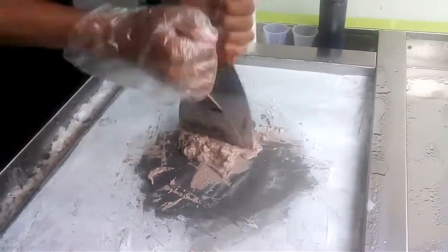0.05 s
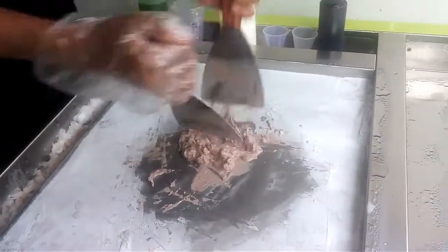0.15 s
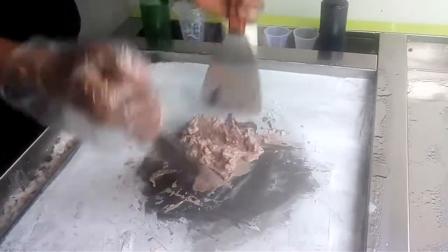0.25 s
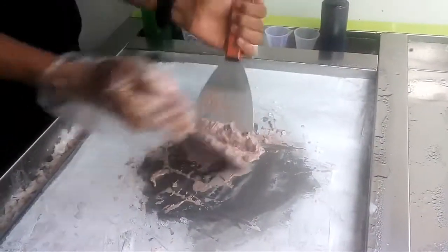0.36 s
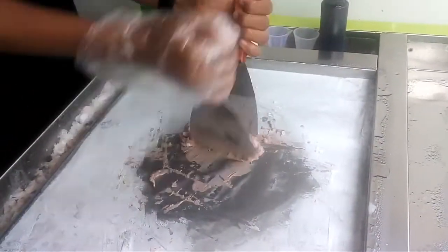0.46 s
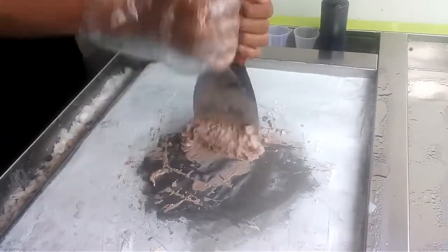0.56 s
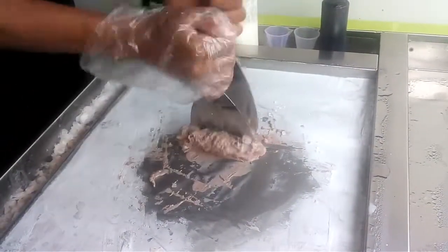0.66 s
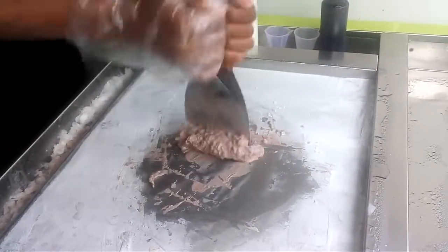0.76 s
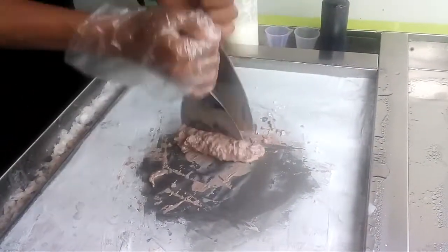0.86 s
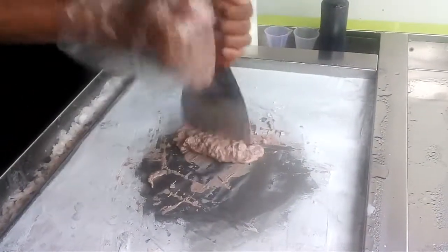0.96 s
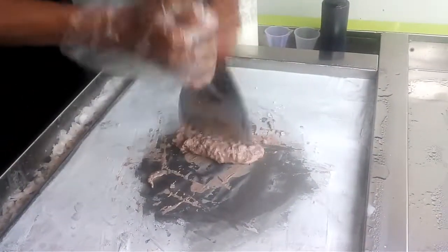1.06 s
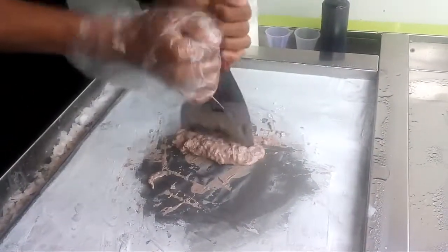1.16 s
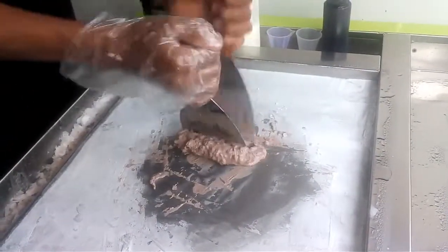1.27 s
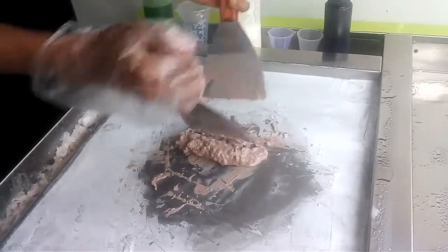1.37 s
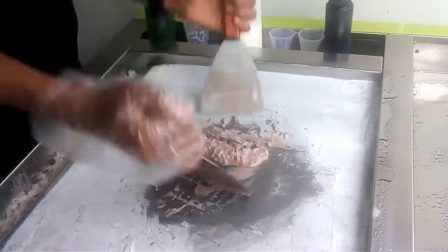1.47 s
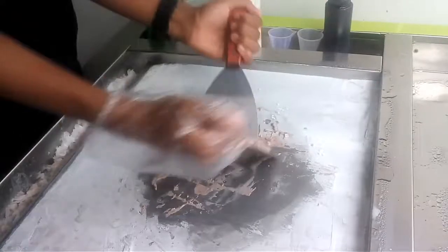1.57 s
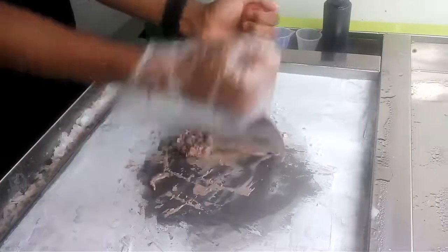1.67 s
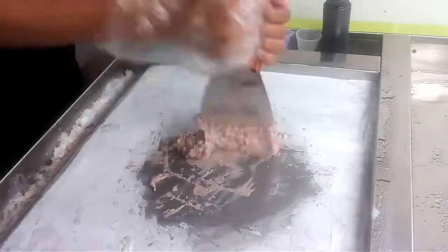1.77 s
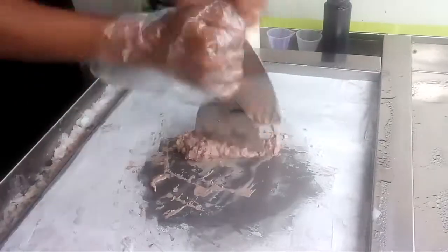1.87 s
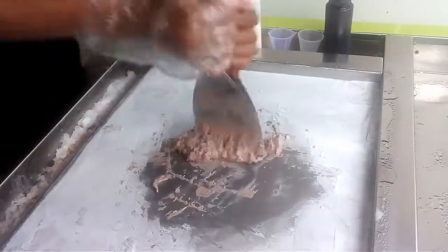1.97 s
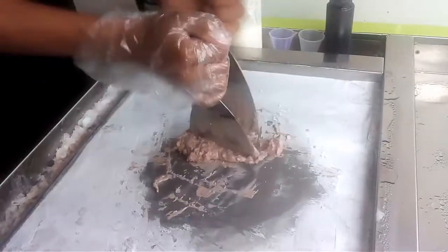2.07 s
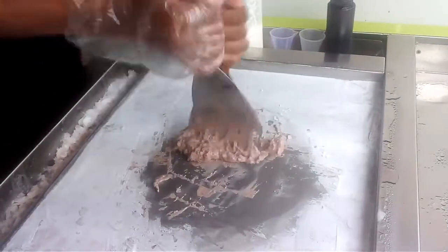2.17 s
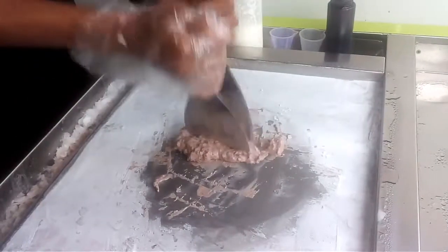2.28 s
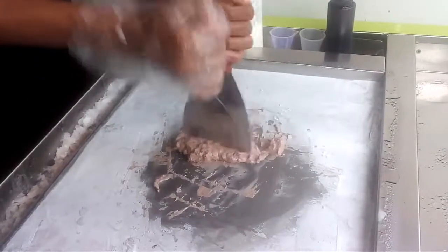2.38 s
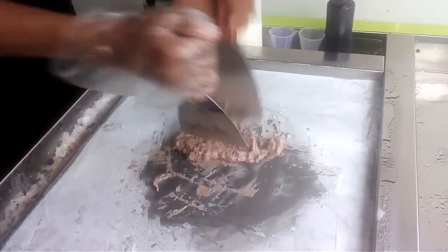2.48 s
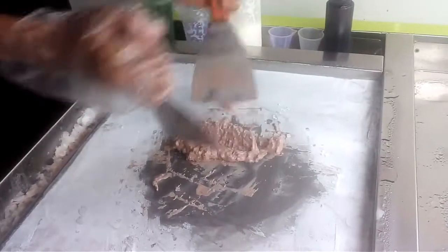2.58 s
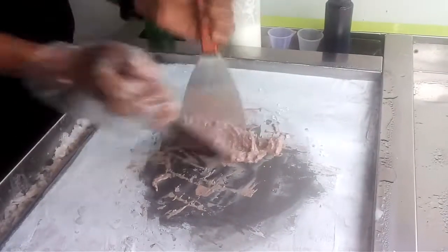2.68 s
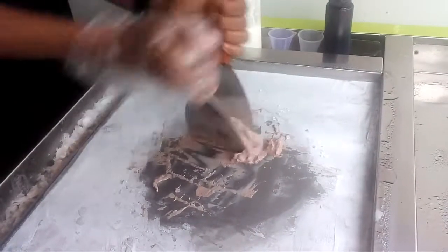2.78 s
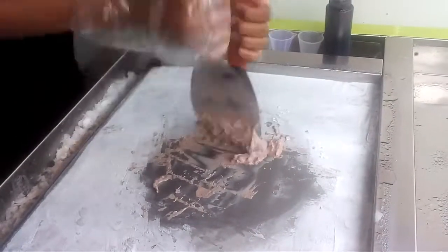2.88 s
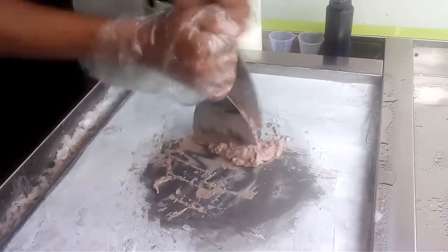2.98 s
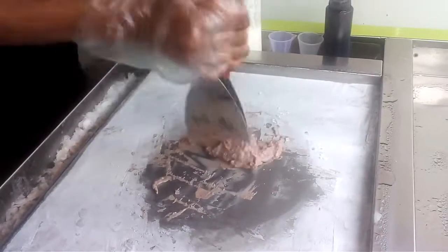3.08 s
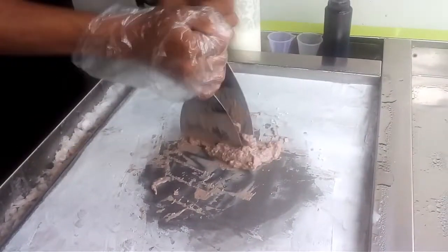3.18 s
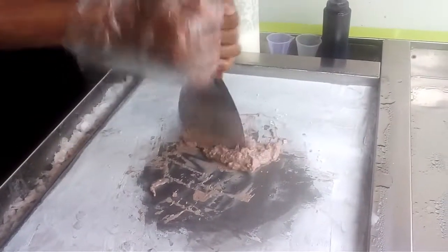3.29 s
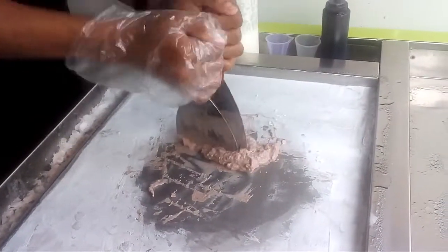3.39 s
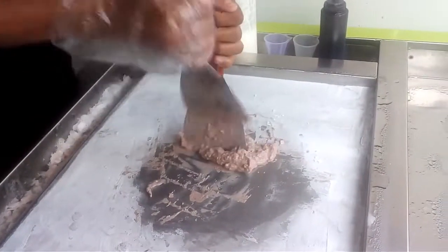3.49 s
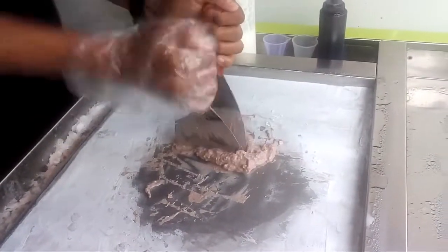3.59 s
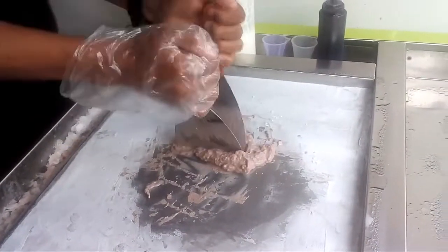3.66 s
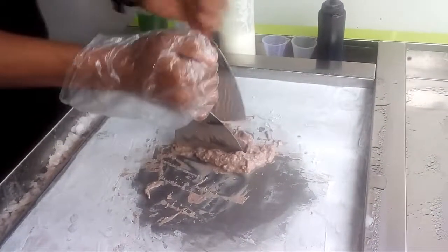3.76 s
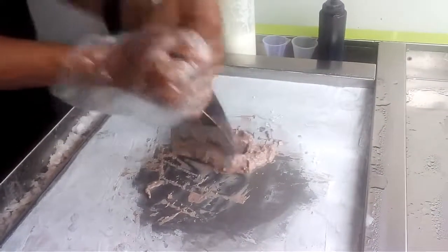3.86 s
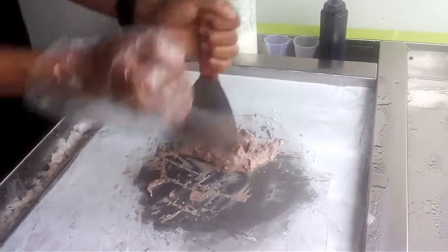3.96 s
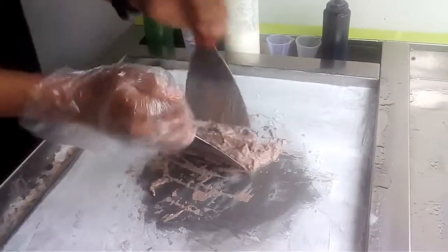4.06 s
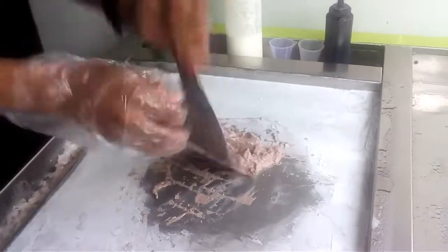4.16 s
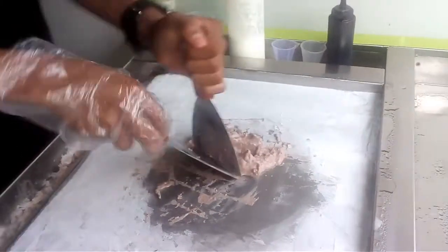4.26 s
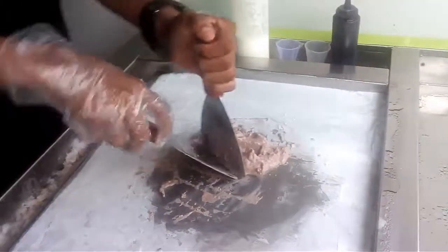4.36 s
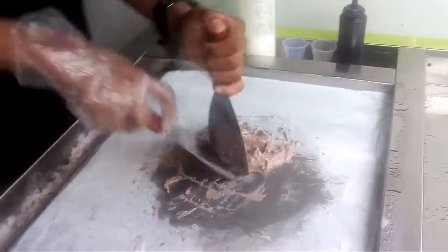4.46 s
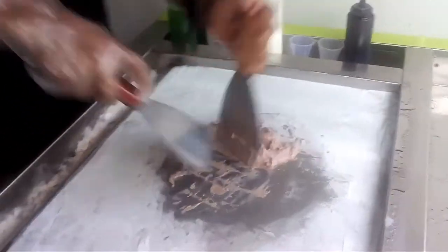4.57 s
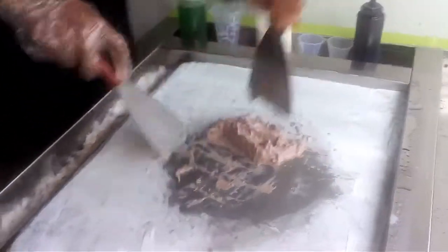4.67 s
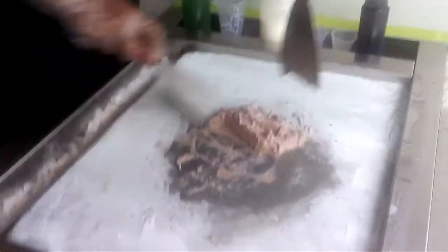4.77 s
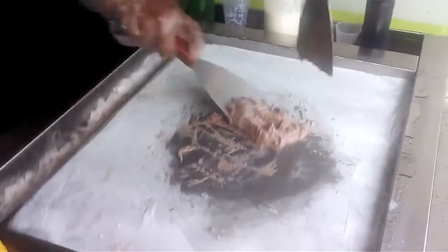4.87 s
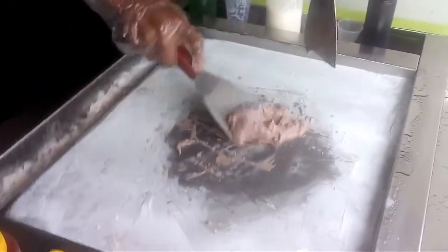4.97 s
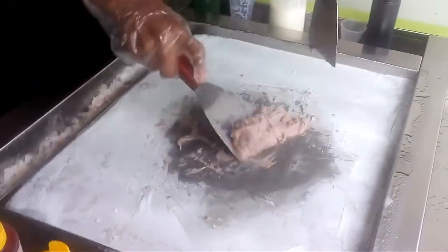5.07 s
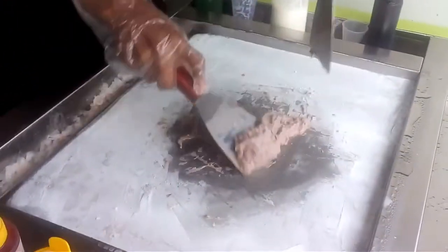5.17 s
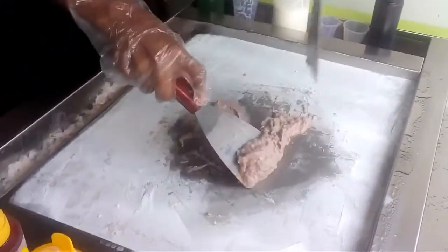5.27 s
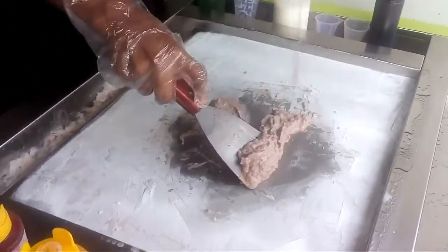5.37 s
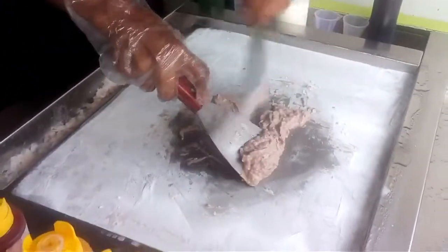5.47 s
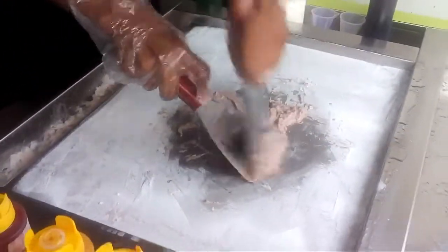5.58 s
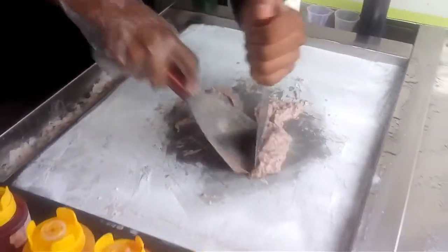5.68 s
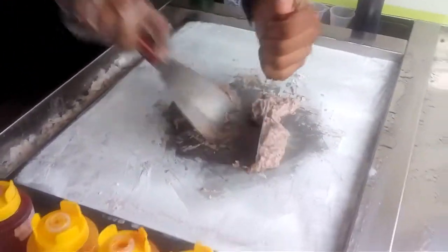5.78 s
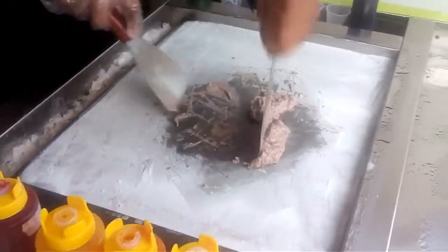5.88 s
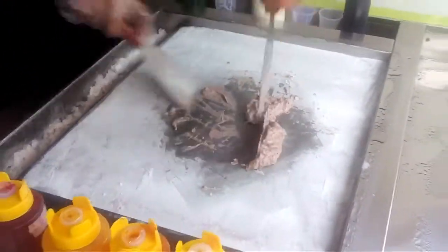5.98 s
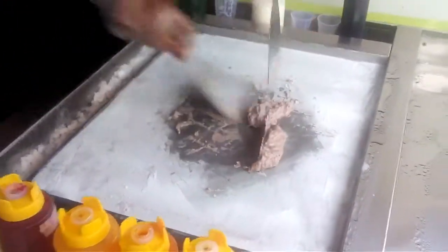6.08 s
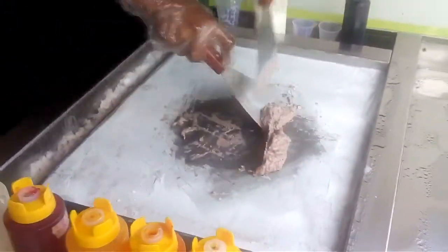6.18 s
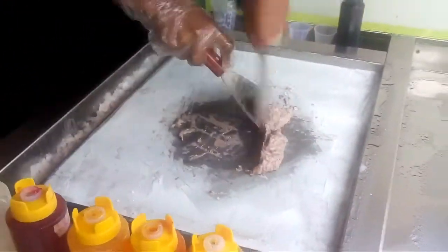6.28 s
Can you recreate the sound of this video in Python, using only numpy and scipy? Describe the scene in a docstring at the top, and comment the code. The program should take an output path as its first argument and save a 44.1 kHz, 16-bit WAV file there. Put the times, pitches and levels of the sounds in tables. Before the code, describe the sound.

A close microphone at a food stall catches steel spatulas on a cold metal plate, over low humming noise and a faint wavering whirr. Three quick chops open within 0.15 s, then a softer clack and short gritty scrape at 0.42. From 0.74 to 1.3 s a flurry of crunchy, bright clacks alternates strong and weak, with tiny ticks just before some; a barely audible thin steel ring lingers until a light touch and scrape at 1.6. A second flurry runs 1.97 to 2.5 s, a brief scrape-tap at 2.78, then more chops from 3.1 to 3.45 and spaced blows at 3.7, 4.0, 4.12 and 4.33. Low air rumble swells from 4.5 to 5.2, with two dull, nearly joined bumps at 4.7. Very faint scrapes follow around 4.85 to 5.1, soft clacks at 5.66 and 5.72, small rumbles, and gentle icy scrapes at 6.05 and 6.17.

```python
"""Two steel spatulas chop a half-frozen dessert mix on the cold plate of a food counter, in quick flurries.
Each chop is a noise-driven clack of the blade, decaying plate and blade modes and a dense wash; light ticks
are thinner blows. Scrapes are ice grains driving shifting blade resonances, and a lifted blade sings as sines.
Later the mix is pushed together with soft scrapes, while air and handling rumble on the microphone.
Coloured stall noise, a low drone and a faint wavering whirr lie beneath."""
import sys
import numpy as np
from scipy import signal
from scipy.fft import rfft, irfft
from scipy.io import wavfile

SR = 44100
rng = np.random.default_rng(int(sys.argv[2]) if len(sys.argv) > 2 else 0)


def output_pcm(signal):
    """Save a mono or channel-first signal as 16-bit PCM at the path in sys.argv[1].

    Samples are clipped to [-1, 1] before scaling.
    """
    pcm = np.clip(np.atleast_2d(signal).T, -1, 1) * 32767
    wavfile.write(sys.argv[1], SR, np.round(pcm).astype(np.int16))


N = 279594

# steady stall noise, relative spectrum: (frequency [Hz], density [dB per Hz])
STALL_SPECTRUM = [(18, -30), (30, -13.5), (50, -10), (93, -1), (200, -21.5), (450, -23), (650, -31),
                  (1200, -29), (1700, -22.5), (2500, -23), (3400, -37), (4300, -33), (5000, -39.5),
                  (16000, -43.5)]
# faint whirr: (time [s], level before flicker [dB])
WHIRR_LEVEL = [(0, -82), (1.9, -68.5), (3.6, -66), (4.55, -62), (5.1, -63.5), (5.6, -68), (6.34, -76)]
# rumble of air and handling, relative spectrum: (frequency [Hz], density [dB per Hz])
RUMBLE_SPECTRUM = [(15, -21.5), (45, -2.5), (85, 1.5), (130, -10.0), (200, -18.5), (400, -34),
                   (1500, -62.0), (6000, -89.5)]
# air moving over the microphone: (start [s], length [s], level before lumps [dB])
GUSTS = [(4.47, 0.73, -38.5), (5.592, 0.22, -44), (5.855, 0.27, -42)]
# knocks on the microphone housing: (time [s], level before low-pass [dB], frequency [Hz], t60 [s])
BUMPS = [(4.7111, -22.5, 131, 0.029), (4.7259, -12.5, 141, 0.037)]
# plate thud, blade ring, clack, edge sizzle: (lower limit [Hz], upper limit [Hz])
REGISTERS = [(90, 900), (900, 3000), (3000, 5000), (5000, 16000)]
# blade comes down on the plate: (time [s], strength [dB], brightness from blade angle [dB])
CHOPS = [(0.002, -33.5, -5.5), (0.077, -27, -1), (0.1481, -30.5, 0.5), (0.4205, -36.5, 8),
         (0.7368, -33.5, -3), (0.854, -30, 2), (0.9342, -36.5, 0.5), (1.0415, -25, 1.5),
         (1.1243, -35, -0.5), (1.218, -25.5, 1.5), (1.2953, -34, 0.5), (1.5897, -43, -2),
         (1.6041, -35.5, 3.5), (1.9733, -30, -5.5), (2.092, -26, 1.5), (2.1728, -31.5, -2.5),
         (2.2719, -26.5, 1), (2.3589, -31.5, -4), (2.4416, -29.5, 1.5), (2.5146, -31.5, -0.5),
         (2.771, -48.5, 4), (2.782, -36, 5.5), (3.0967, -28.5, -3), (3.1933, -27, 0), (3.27, -31.5, -2),
         (3.3782, -26.5, -2), (3.4438, -30.5, -1), (3.7049, -30, -1), (3.9917, -26.5, 1), (4.1242, -28, 3),
         (4.3346, -27.5, 0), (4.8492, -51.5, -10), (5.6616, -48.5, 17.5), (5.7212, -38, -3),
         (6.052, -50.5, 6)]
# registers of a middling chop: (level [dB], gain per strength [dB per dB], share of brightness [1])
CHOP_WEIGHTS = [(-40.5, 0.81, 0), (-30, 1, 0), (-32, 1.39, 0.68), (-40.5, 1.23, 1)]
# blade corner touches, mostly just ahead of a chop: (time [s], clack level [dB], sizzle re clack [dB])
TICKS = [(0.061, -40, -1), (0.841, -42.5, -5), (0.9243, -44.5, -1.5), (1.0297, -38.5, -6),
         (1.2063, -37, -4), (2.0758, -39.5, -9), (2.1615, -50, 1.5), (2.2573, -39.5, 0), (2.3497, -47, 2),
         (2.428, -43.5, 1.5), (3.179, -40.5, -7.5), (3.357, -45, -3), (3.916, -50, -3), (3.984, -43, -1.5),
         (4.2727, -45.5, 0.5)]
# blade pressed against the plate, before detuning: (frequency [Hz], width [Hz], relative level [dB])
PRESSED_BLADE = [(306.3, 74, -21), (1057, 400, -14), (1278, 310, -2), (1882, 82, 6), (2275, 67, 12),
                 (2570, 234, 5), (3576, 280, 2), (4228, 264, 3.5), (4750, 990, -16), (5554, 580, -10),
                 (6650, 650, -9), (8150, 800, -17), (9320, 840, -19), (11700, 680, -27.5),
                 (13500, 1800, -35.5)]
# plate and its pan, before random spread: (frequency [Hz], relative level [dB], t60 [s])
PLATE_MODES = [(100.9, -6, 0.55), (257.5, -7, 0.45), (309.2, 1, 0.25), (402.9, -0.5, 0.34),
               (452, 0.5, 0.27), (472.3, -7, 0.32), (602.5, -7.5, .3), (767, -11, 0.34), (860, -25, 0.14),
               (897, -4, 0.33), (978, -4.5, 0.16), (1109, 1, 0.13), (1200, 1, 0.15), (1386, -2, 0.3),
               (1593, -3, 0.2), (1708, 8.5, 0.12), (1786, -3, 0.053)]
# blade pinned after the blow, before bend and spread: (frequency [Hz], relative level [dB], t60 [s])
PINNED_MODES = [(2154, 1.5, 0.25), (2450, -8, 0.2), (2550, -3, 0.16), (3500, -11, 0.11), (4200, -5.5, 0.11),
                (4370, -16.5, 0.037), (6400, -19.5, .14)]
# dense ring of counter and stall, relative spectrum: (frequency [Hz], density [dB per Hz])
WASH_SPECTRUM = [(90, -4.5), (300, 3.5), (700, -3.5), (1100, 4), (2000, 9), (2280, 9.5), (2750, 2),
                 (3400, -3), (4250, 0), (5100, -13), (6600, -12), (9400, -18.5), (10800, -30.5),
                 (12200, -22.5), (16000, -38.5)]
# its decay: (frequency [Hz], t60 [s])
WASH_T60 = [(260, 0.38), (1600, 0.2), (3900, 0.24), (9000, 0.21)]
# blade pushed through the mix: (start [s], length [s], level [dB], initial pitch factor from flexing [1],
# hiss where the edge meets bare frost, re blade [dB])
PUSHES = [(0.42, 0.076, -42.5, .98, -15.5), (1.598, 0.099, -42, 0.95, -14.5),
          (2.781, .015, -35, 1.016, -10), (4.845, 0.064, -56.5, 0.98, -9), (4.959, 0.047, -55.5, 1.01, -12),
          (5.08, 0.075, -64, 0.98, -6), (6.051, 0.14, -56.5, 0.94, -7), (6.168, 0.076, -46, 0.93, -3.5)]
# flexed, sliding blade, before pitch shifts: (frequency [Hz], width [Hz], relative level [dB])
SLIDING_BLADE = [(490, 47, -24), (2040, 660, -1.5), (2340, 148, 13), (3420, 310, -3.5), (4120, 280, -2.5),
                 (5800, 330, -8.5), (6410, 99, -13.5), (8200, 400, -37), (9100, 170, -17),
                 (12300, 230, -35), (13200, 1000, -43)]
# steel edge on frost, relative spectrum: (frequency [Hz], density [dB per Hz])
HISS_SPECTRUM = [(1500, -42), (3200, 3), (4400, 2), (5200, -2), (6200, 7), (6800, 4), (8100, -15),
                 (9400, -2.5), (10700, -24), (12000, -8), (16000, -26)]
# free blade: (frequency [Hz], relative level [dB])
FREE_BLADE = [(2830, -14.5), (3526, 0.5), (3882, -15)]

STALL_DB = -59
GUST_ATTACK_S, GUST_RELEASE_DB_PER_S, STILL_AIR_DB = 0.07, 550, -69
MIDDLING_DB = -30
TICK_THUD_DB, TICK_RING_DB = -20, -5.5  # re the tick's clack
# the hand leans in, the blade stiffens as it slides, the pressure dies away
PUSH_ATTACK_S, PUSH_RISE_PER_S, PUSH_RELEASE_DB_PER_S = 0.0087, 0.7, 235
SING_FROM_S, SING_UNTIL_S, SING_DB, SING_FADE_DB_PER_S = 1.22, 1.586, -62, 3000
EDGE_ON_S, TURN_S = 1.505, 0.026
CUTOFF_HZ = 15900


def from_db(db):
    """Decibels to gain."""
    return 10 ** (np.asarray(db) / 20)


def rms_one(x):
    """Scale to unit rms."""
    return x / np.sqrt(np.mean(x ** 2) + 1e-20)


def unit_energy(x):
    """Scale to a total energy of one."""
    return x / np.sqrt(np.sum(x ** 2) + 1e-20)


def level_curve(rows):
    """Gain over time from (time [s], level [dB]) rows, -200 dB outside them."""
    s, db = np.transpose(rows)
    return from_db(np.interp(np.arange(N) / SR, s, db, left=-200, right=-200))


def at_hz(points, hz):
    """Read a table on a log-frequency axis."""
    f, value = np.transpose(points)
    return np.interp(np.log(np.maximum(hz, 1)), np.log(f), value)


def colour(x, spectrum):
    """Weight a signal's spectrum, then scale to unit rms."""
    hz = np.fft.rfftfreq(len(x), 1 / SR)
    return rms_one(irfft(rfft(x) * from_db(at_hz(spectrum, hz)), len(x)))


def noise(spectrum, size):
    """Coloured noise of unit rms."""
    return colour(rng.standard_normal(size), spectrum)


def drift(knots_per_s):
    """Random wander: straight lines between normal knots of unit spread."""
    knots = rng.standard_normal(N // 100)
    return np.interp(np.arange(N) / SR * knots_per_s, np.arange(len(knots)), knots)


def resonate(x, modes, bend=1):
    """Parallel resonances with alternating signs; bend scales their pitch over time."""
    out = 0
    turns = np.cumsum(bend * np.ones(len(x))) / SR
    for k, (hz, width_hz, db) in enumerate(modes):
        r = np.exp(-np.pi * width_hz / SR)
        spin = np.exp(2j * np.pi * hz * turns)
        # shift the mode to 0 Hz, smooth, shift back
        envelope = signal.lfilter([1 - r], [1, -r], x / spin + 1e-12)
        out = out + (-1) ** k * from_db(db) * np.real(spin * envelope)
    return out


def rippled(x, ripple_db=3.5, spacing_hz=85):
    """Sheet steel has crowded modes: uneven peaks and notches across the spectrum."""
    hz = np.fft.rfftfreq(len(x), 1 / SR)
    peaks = np.clip(rng.standard_normal(SR // 20), -2, 2)
    ripple = ripple_db * np.interp(hz / spacing_hz, np.arange(len(peaks)), peaks)
    return rms_one(irfft(rfft(x) * from_db(ripple), len(x)))


def swell(t, length_s, attack_s, release_db_per_s):
    """Attack, hold and release of a gesture that starts at t = 0."""
    attack = np.clip(t / attack_s, 0, 1)
    return attack * from_db(-release_db_per_s * np.maximum(t - length_s, 0))


def background(hum_db=-65.5, hum_hz=92, hum_width_hz=40, whirr_hz=1710, whirr_width_hz=230,
               whirr_wander=0.035, whirr_flicker_db=1.5):
    """Coloured stall noise; the freezer's drone and a wavering whirr are twice-resonated noise."""
    motor = [(hum_hz, hum_width_hz, 0)]
    drone = rms_one(resonate(resonate(rng.standard_normal(N), motor), motor))
    band = [(whirr_hz, whirr_width_hz, 0)]
    bend = 1 + whirr_wander * drift(3.7)
    whirr = rms_one(resonate(resonate(rng.standard_normal(N), band, bend), band, bend))
    whirr = whirr * from_db(whirr_flicker_db * drift(8))
    stall = from_db(STALL_DB) * noise(STALL_SPECTRUM, size=N)
    return stall + from_db(hum_db) * drone + level_curve(WHIRR_LEVEL) * whirr


def airflow():
    """Gusts over nearly still air, as a gain."""
    t = np.arange(N) / SR
    gain = from_db(STILL_AIR_DB)
    for s, length_s, db in GUSTS:
        gain = gain + from_db(db) * swell(t - s, length_s, GUST_ATTACK_S, GUST_RELEASE_DB_PER_S)
    return gain


def handling(lumpy_db=2.0):
    """Low, lumpy buffeting and dull knocks (decaying, low-passed sines) at the microphone."""
    rumble = noise(RUMBLE_SPECTRUM, size=N)
    out = rumble * airflow() * from_db(lumpy_db * drift(17))
    low_pass = signal.butter(2, 600, fs=SR, output="sos")
    for s, db, hz, t60_s in BUMPS:
        age_s = np.maximum(np.arange(N) / SR - s, 0)
        knock = from_db(db - 60 * age_s / t60_s) * np.sin(2 * np.pi * hz * age_s)
        out = out - signal.sosfilt(low_pass, knock + 1e-12)
    return out


def blows():
    """Time and register levels of every contact: harder chops gain more in the treble than in the thud."""
    base_db, follows, bright_share = np.transpose(CHOP_WEIGHTS)
    contacts = []
    for s, db, bright_db in CHOPS:
        contacts.append((s, base_db + follows * (db - MIDDLING_DB) + bright_share * bright_db))
    for s, db, sizzle_db in TICKS:
        contacts.append((s, db + np.array([TICK_THUD_DB, TICK_RING_DB, 0, sizzle_db])))
    return contacts


def clack(t, crush_s=0.0022, crack_db=-33.0, crack_s=0.0015, detune=0.02):
    """The edge crushes through icy grains in a few milliseconds and jolts the blade."""
    force = rng.standard_normal(len(t)) * np.exp(-t / crush_s)
    crack = signal.lfilter([1, -1], [1, -1.3, 0.5], rng.standard_normal(len(t)))
    crack = crack * np.exp(-t / crack_s)
    grip = 1 + detune * rng.standard_normal()
    return unit_energy(resonate(force, PRESSED_BLADE, grip)) + from_db(crack_db) * unit_energy(crack)


def ring(modes, t, turns, spread_db=3.5):
    """Free modes of unit total energy; each point of contact wakes them differently."""
    hz, db, t60_s = np.transpose(modes)[:, :, None]
    weights = from_db(spread_db * rng.standard_normal(len(modes))) * rng.choice([-1, 1], len(modes))
    partials = from_db(db - 60 * t / t60_s) * np.sin(2 * np.pi * hz * turns)
    return unit_energy(weights @ partials)


def strikes(wash_db=-1.5, plate_db=-9.0, pinned_db=-5.5, build_s=0.0014, rise=0.062, lean_s=0.07,
            detune=0.018, chatter=0.015):
    """Each blow is a clack, ringing blade and plate and a dense wash, weighted by register."""
    size, early = SR // 2, SR // 25
    t, out = np.arange(size) / SR, np.zeros(N + size)
    filters = [signal.butter(4, band, "band", fs=SR, output="sos") for band in REGISTERS]
    fades = []
    for low_hz, high_hz in REGISTERS:
        t60_s = at_hz(WASH_T60, np.sqrt(low_hz * high_hz))
        fades.append(from_db(-60 * t / t60_s) * (1 - np.exp(-t / build_s)))
    for s, register_db in blows():
        # the pinned blade rises in pitch as the hand leans on it
        bend = 1 + detune * rng.standard_normal() + rise * (1 - np.exp(-t / lean_s))
        # grit under the edge shakes that pitch
        bend = bend + chatter * drift(300)[:size]
        blow = from_db(plate_db) * ring(PLATE_MODES, t, t)
        blow += from_db(pinned_db) * ring(PINNED_MODES, t, np.cumsum(bend) / SR)
        blow[:early] += clack(t[:early])
        wash = from_db(wash_db) * rippled(noise(WASH_SPECTRUM, size=size), ripple_db=4.0, spacing_hz=55.24)
        at = max(round(s * SR), 0)
        for sos, fade, db in zip(filters, fades, register_db):
            part = signal.sosfilt(sos, blow + wash * unit_energy(fade))
            # level set over the first 40 ms
            out[at:at + size] += from_db(db) * part / np.std(part[:early])
    return out[:N]


def scrapes(grains_per_s=4500, grain_db=1.5, judder_db=-0.5, waver=0.018, grit_db=-7.0):
    """Ice grains catch under the edge: they hiss, ring in the counter and excite the flexing blade."""
    size = SR // 2
    t, out = np.arange(size) / SR, np.zeros(N + size)
    for s, length_s, db, flex, hiss_db in PUSHES:
        sizes = from_db(grain_db * np.minimum(rng.exponential(1, size), 4)) * rng.choice([-1, 1], size)
        caught = rng.random(size) < grains_per_s / SR
        grains = sizes * caught * from_db(judder_db * drift(140)[:size])
        bend = flex + PUSH_RISE_PER_S * np.minimum(t, length_s) + waver * drift(40)[:size]
        blade = rms_one(resonate(grains, SLIDING_BLADE, bend))
        grit = from_db(grit_db) * colour(grains, WASH_SPECTRUM)
        hiss = from_db(hiss_db) * colour(grains, HISS_SPECTRUM)
        rasp = rippled(blade + grit + hiss, ripple_db=4.5, spacing_hz=126.6)
        pressure = from_db(db) * swell(t, length_s, PUSH_ATTACK_S, PUSH_RELEASE_DB_PER_S)
        at = round(s * SR)
        out[at:at + size] += pressure * rasp
    return out[:N]


def singing_blade(attack_s=0.0091):
    """A lifted blade's steady modes, sung until touchdown; its two faces radiate with opposite sign."""
    t = np.arange(N) / SR
    modes = sum(from_db(db) * np.sqrt(2) * np.sin(2 * np.pi * hz * t) for hz, db in FREE_BLADE)
    # fades for a moment as it turns edge-on to the microphone
    facing = np.tanh((t - EDGE_ON_S) / TURN_S)
    envelope = swell(t - SING_FROM_S, SING_UNTIL_S - SING_FROM_S, attack_s, SING_FADE_DB_PER_S)
    return from_db(SING_DB) * envelope * facing * modes


def scene():
    """Everything at one close microphone."""
    return (strikes() + scrapes() + singing_blade() + handling() + background())[None]


def record(dry):
    """A steep elliptic low-pass cuts the top."""
    return signal.sosfilt(signal.ellip(10, 0.2, 80, CUTOFF_HZ, fs=SR, output="sos"), dry)


dry = scene()
out = record(dry)
output_pcm(out)
```